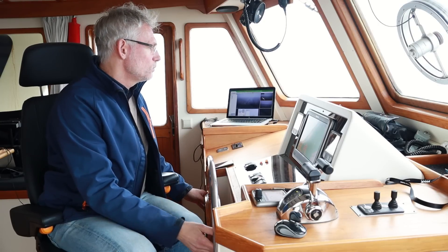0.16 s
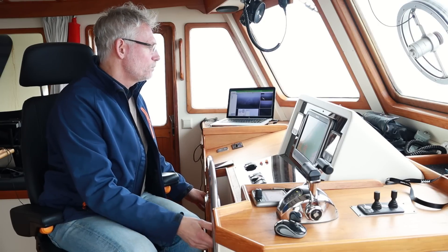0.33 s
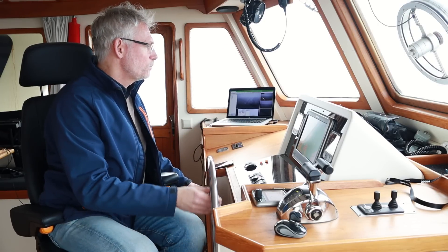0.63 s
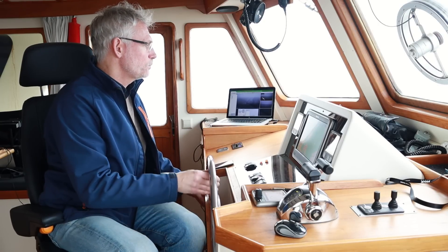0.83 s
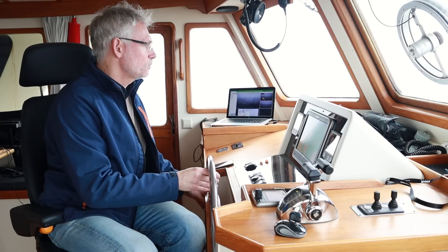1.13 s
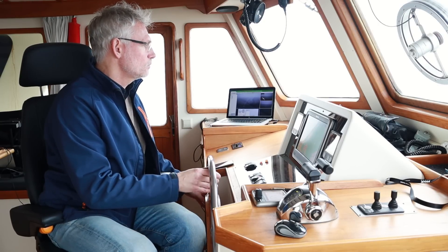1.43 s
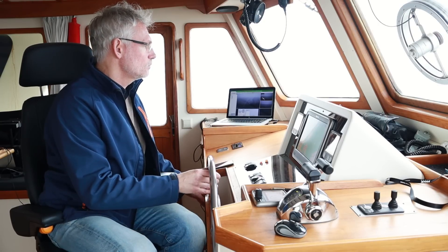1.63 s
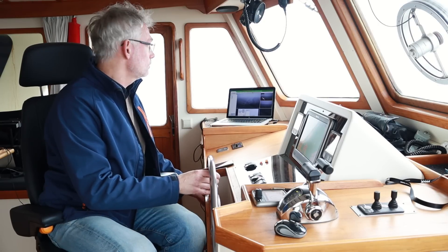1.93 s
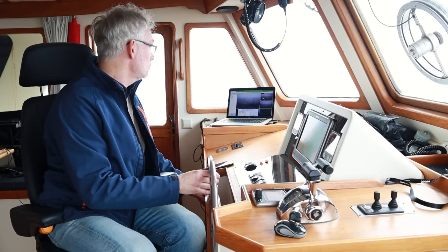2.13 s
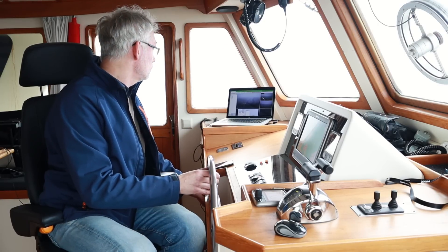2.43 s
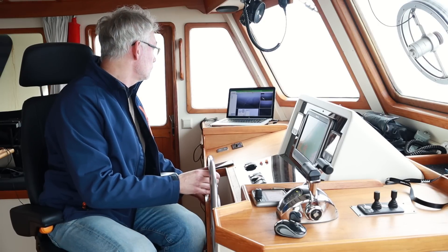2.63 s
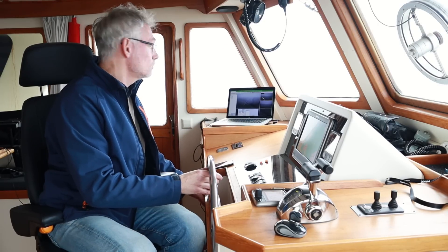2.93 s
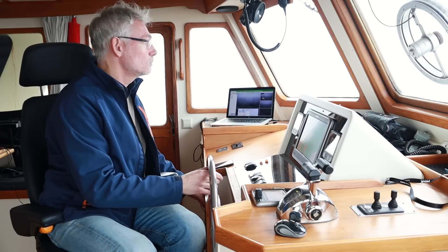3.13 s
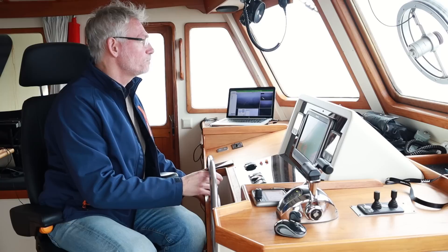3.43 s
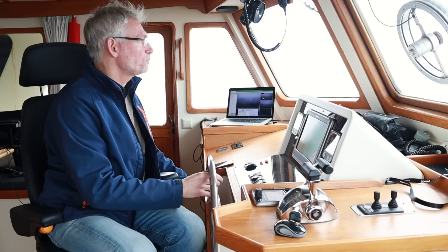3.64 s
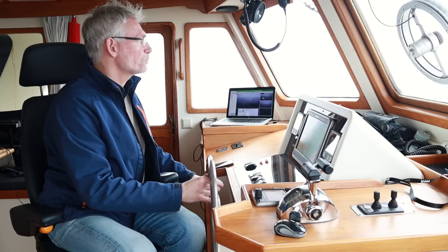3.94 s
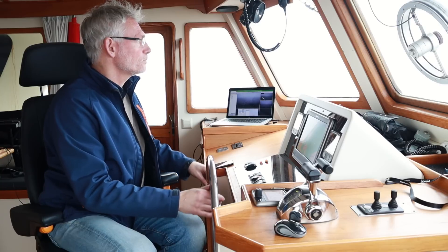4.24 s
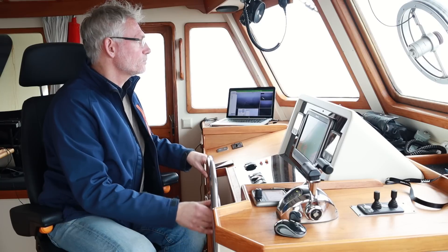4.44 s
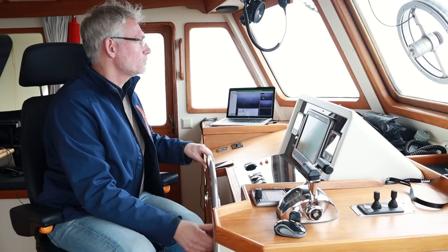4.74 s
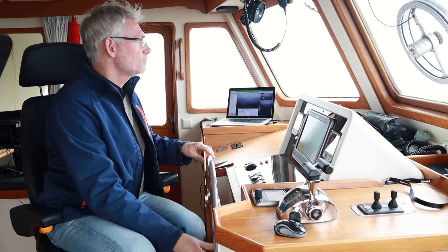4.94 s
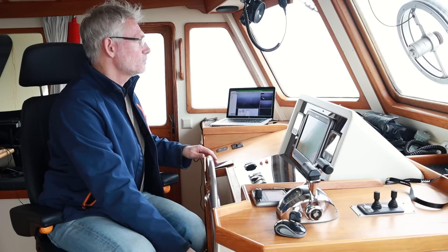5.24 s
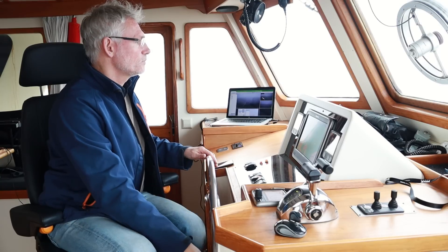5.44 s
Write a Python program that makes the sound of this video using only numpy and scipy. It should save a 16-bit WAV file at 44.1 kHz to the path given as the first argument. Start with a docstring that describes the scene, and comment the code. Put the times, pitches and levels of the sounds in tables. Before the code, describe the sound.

Low engine drone and slight helm noises for three seconds, then a short pump whirr and one long, brassy, unwavering boat horn note to the end.

```python
"""An air horn on the roof of a small boat gives one long steady blast, heard inside the wheelhouse:
a chopped air stream makes its overtones, each weighted by the resonances of roof and cabin.
A diesel idles below deck as cycle tones, shaken panels and a broad drone.
At the helm cloth rustles and small things knock, as shaped noise. The horn's little air pump whirs up
first and makes the note throb faintly; the recorder turns its gain down when the blast arrives."""
import sys
import numpy as np
from scipy import signal
from scipy.fft import rfft, irfft, next_fast_len
from scipy.io import wavfile
from scipy.ndimage import map_coordinates

SR = 44100
rng = np.random.default_rng(int(sys.argv[2]) if len(sys.argv) > 2 else 0)


def pcm_store(signal):
    """Save signal as 16-bit PCM."""
    levels = np.round(np.clip(np.atleast_2d(signal), -1, 1) * 32767)
    wavfile.write(sys.argv[1], SR, levels.astype(np.int16).T)


def elevation(decibels):
    """Turn decibel levels (scalar or array-like) into linear amplitude ratios."""
    levels = np.asarray(decibels, float)
    return 10 ** (levels / 20)


N = 245637
TIME = np.arange(N) / SR


def unit(x):
    """Scaled to rms 1."""
    return x / np.sqrt(np.mean(x ** 2) + 1e-20)


def wobble(rate):
    """A smooth random curve of 200 knots, rate knots a second, and zero after the last."""
    return map_coordinates(rng.standard_normal(200), [TIME * rate])


def filtered(x, response):
    """x times a response of frequency, padded so that its tail does not wrap round."""
    m = next_fast_len(N + 8192)
    return irfft(rfft(x, m) * response(np.fft.rfftfreq(m, 1 / SR)), m)[:N]


def coloured(x, points):
    """x through (f/Hz, level/dB) points read on a log frequency axis."""
    f, db = np.transpose(points)
    return filtered(x, lambda hz: elevation(np.interp(np.log(hz + 1), np.log(f + 1), db)))


def noise():
    """White noise."""
    return rng.standard_normal(N)


def tone(turn):
    """A sine of rms 1 at the phase turn."""
    return np.sqrt(2) * np.sin(turn)


# diesel below deck, tones at multiples of the cycle rate: [multiple, rms level/dB, unsteadiness/dB]
CYCLE_TONES = [(5.92, -35.5, 0.34), (10.22, -54, 1.8), (11.13, -57.5, 2), (11.49, -53.5, 2),
               (11.96, -45.5, 1.2), (16.14, -54.5, 2), (17.95, -48, 2.5), (21.93, -52, 2.5),
               (26.85, -54, 1.8), (36.2, -56, 2.3), (38.85, -58.5, 2.2), (39.9, -55, 3), (47.35, -54, 2),
               (49.4, -52.5, 1.2), (50.96, -52.5, 2.6), (51.3, -49, 3.6), (53, -55, 2.1),
               (53.56, -48.5, 2.2), (54, -53.5, 2)]
# hull and cabin panels shaken by the engine: [f/Hz, width/Hz, relative level/dB]
PANELS = [(92.5, 14, -5), (173.6, 32.6, -8), (191.2, 24, -4.5), (283, 23, -11), (356, 15, -11),
          (410.6, 17, -7), (440.6, 16, -4), (471.8, 13.8, -1.5), (572, 45, -13), (682, 15, -10),
          (700, 26, -16.5)]
# colour of the broad engine noise: [f/Hz, relative level/dB per Hz]
DRONE = [(15, -34), (35, -12.5), (70, -12), (250, -12.5), (500, -11.5), (750, -18), (1300, -23),
         (2200, -24), (3500, -31.5), (6500, -38.5), (9000, -46), (11000, -53.5), (15500, -52.5)]
CYCLE_HZ, CYLINDERS = 8.775, 6  # each cylinder fires once per engine cycle


def panel_response(f):
    """Sum of damped resonances, one per panel, with alternating sign."""
    total = 0
    for k, (centre, width, db) in enumerate(PANELS):
        damping = 1j * f * width
        total = total + (-1) ** k * elevation(db) * damping / (centre ** 2 - f ** 2 + damping)
    return total


def engine():
    """Cycle tones, panels rung by noise that swells with each firing, and a broad drone."""
    turn = 2 * np.pi * np.cumsum(CYCLE_HZ + 0.006 * wobble(3)) / SR
    tones = np.zeros(N)
    for k, db, sway_db in CYCLE_TONES:
        level = elevation(db + sway_db * wobble(5))
        tones += level * tone(k * turn + k * k + np.pi / 2)
    firing = 1 + 0.3 * np.cos(CYLINDERS * turn)
    panels = elevation(-37.5) * unit(filtered(firing * noise(), panel_response))
    drone = elevation(-37.5 + 0.76 * wobble(6.52)) * unit(coloured(noise(), DRONE))
    return tones + panels + drone


# sleeve rubbing in soft swells at the helm: [middle t/s, peak level/dB, half length/s]
RUSTLE = [(0.574, -54, 0.23), (4.198, -60, .6), (5.18, -53, .22)]
# colour of the cloth: [f/Hz, relative level/dB per Hz]
CLOTH = [(500, -34), (2000, -2.5), (5000, 4), (9000, -1.5), (13000, -12), (16000, -13)]
RUSTLE_REST_DB = -65  # the swells add to this


def rustle():
    """A rubbing sleeve: cloth-coloured noise in bell-shaped swells with a fine flutter of level."""
    rub = elevation(RUSTLE_REST_DB)
    for middle, db, half in RUSTLE:
        rub = rub + elevation(db) * np.exp(-((TIME - middle) / half) ** 2)
    return rub * elevation(0.8 * wobble(40)) * unit(coloured(noise(), CLOTH))


# small knocks and scuffs at the helm: [start t/s, rms level before decay/dB, t60/s, centre f/Hz]
KNOCKS = [(.003, -42, .4, 2100), (.745, -39, .2, 1200), (2.83, -58, .15, 8000), (2.868, -42, .1, 1300),
          (3.725, -42, .15, 2800), (3.85, -40, .25, 2900), (4.494, -38, .05, 4200), (4.506, -37, .1, 2600)]


def knocks():
    """Small things knock as short dying puffs of noise, each with its own colour."""
    sound = np.zeros(N)
    for start, db, t60, hz in KNOCKS:
        # the colour falls 16 dB one octave from the centre, 64 dB at two
        puff = unit(filtered(noise(), lambda f: elevation(-16 * np.log2((f + 1) / hz) ** 2)))
        age = np.maximum(TIME - start, 0)
        rise = 1 - np.exp(-age / 0.00091)
        sound += elevation(db - 60 * age / t60) * rise * puff
    return sound


# tones of the air pump: [f/Hz, rms level/dB]
PUMP = [(447, -50), (545, -40), (592, -39.5), (645, -48.5)]
PUMP_ON_S, WHIRR_RISE_S, TONE_RISE_S = 2.87, 0.028, 0.16


def pump():
    """The pump motor hums in a few fuzzy tones, which swell in over a whirr."""
    tones = np.zeros(N)
    for hz, db in PUMP:
        level = elevation(db + 1.5 * wobble(12))
        tones += level * tone(2 * np.pi * np.cumsum(hz + 1.3 * wobble(4)) / SR)
    whirr_colour = [(300, -29.5), (700, 1.5), (1400, 0.0), (2500, -11), (5000, -26), (16000, -72)]
    whirr = elevation(-41) * unit(coloured(noise(), whirr_colour))
    whirr_rise = np.clip((TIME - PUMP_ON_S) / WHIRR_RISE_S, 0, 1)
    tone_rise = np.clip((TIME - PUMP_ON_S) / TONE_RISE_S, 0, 1)
    return whirr_rise * whirr + tone_rise * tones


# narrow resonances (+) and nulls (-) of roof and cabin that the overtones slide through:
# [f/Hz, width/Hz, level/dB]
CABIN = [(262.2, 3.7, -6.5), (524.4, 10, -4.5), (793.3, 40, -38), (1052.9, 8.8, 20), (1305.3, 12, 15.5),
         (1572.1, 12.6, 20), (1827.7, 20.6, 14), (1843, 22.9, -9.4), (2109.1, 47.6, -30),
         (2126, 33.2, -17.7), (2352, 4.5, -11.5), (2366.4, 7.5, -12.8), (2619.5, 7.5, -13.2),
         (2631, 21.2, 16), (2869, 5.5, 4), (2892.4, 18.2, -17), (3124.1, 19.2, 5.4), (3389.8, 6.5, 12.5),
         (3400.1, 68.4, -25.2), (3650.3, 7, 11), (3683.4, 10, 9.8), (3929.1, 24.1, -10.5),
         (3973.2, 54.3, -8), (4174.2, 17.2, 11.1), (4451, 74.2, -16.9), (4695.5, 8, -8), (4703.6, 12, 10.9),
         (4723.2, 17.1, 18.2)]


def cabin(f):
    """Complex response of roof and cabin at the frequencies f, a product of peaks and dips."""
    response = 1
    for centre, width, db in CABIN:
        detuning, damping = centre ** 2 - f ** 2, 1j * f * width
        response = response * (detuning + damping * elevation(db)) / (detuning + damping)
    return response


# the held note of the horn on the roof: [overtone number, rms level/dB]
OVERTONES = [(1, -27), (2, -18), (3, -11), (4, -20.5), (5, -16), (6, -25.5), (7, -24.5), (8, -28),
             (9, -39.5), (10, -54), (11, -40), (12, -40), (13, -44.5), (14, -44.5), (15, -52), (16, -48.5),
             (17, -67), (18, -66.5)]
# the valve opens and air reaches the diaphragm over the attack, slowly at first (power of the rise);
# higher overtones speak later (power added for each)
VALVE_S, ATTACK_S, RISE_POWER, RISE_PER_OVERTONE = 3.016, 0.033, 2, 0.14
# the note starts sharp while the air pressure settles:
# a quick bell-shaped slide and a slow sag onto the held pitch
HELD_HZ, SLIDE_FROM_S, SHARP_HZ, SLIDE_S, SAG_HZ, SAG_S = 260.88, 3, 5.8, 0.08, 0.5, 0.25
THROB_HZ = 62.9  # pump strokes


def horn():
    """A diaphragm chops the air once a cycle; the cabin weighs and delays each overtone as pitch slides."""
    age = np.maximum(TIME - SLIDE_FROM_S, 0)
    pitch = HELD_HZ + SHARP_HZ * np.exp(-(age / SLIDE_S) ** 2) + SAG_HZ * np.exp(-age / SAG_S)
    turn = 2 * np.pi * np.cumsum(pitch + 0.029 * wobble(6.5)) / SR
    steps = np.linspace(HELD_HZ, pitch.max(), 200)
    air = np.clip((TIME - VALVE_S) / ATTACK_S, 0, 1)
    sound = np.zeros(N)
    for k, db in OVERTONES:
        passed = cabin(k * steps)
        # relative to the held pitch, where the table's level holds
        size = elevation(db) * np.interp(pitch, steps, passed / passed[0])
        waver = elevation(0.11 * k * wobble(3.6))  # moving air and boat: higher overtones waver more
        lag = 1.17 * k * k + np.pi / 12  # radians; the horn's bell spreads each pulse
        rise = air ** (RISE_POWER + RISE_PER_OVERTONE * k)
        wave = np.sqrt(2) * np.real(size * np.exp(1j * (k * turn - lag)))
        sound += waver * rise * wave
    # pump strokes ripple the pressure
    throb = 1 + 0.03 * np.sin(2 * np.pi * np.cumsum(THROB_HZ + 1.1 * wobble(1.7)) / SR)
    return sound * throb


def scene():
    """Everything reaches one microphone in the wheelhouse."""
    return (engine() + rustle() + knocks() + pump() + horn())[None]


def top_cut(x):
    """Nothing passes above the cut-off."""
    return signal.sosfilt(signal.butter(12, 15700, fs=SR, output="sos"), x)


def smoothed(x, tau):
    """x followed with a time constant of tau seconds."""
    return signal.lfilter([1 / (tau * SR)], [1, 1 / (tau * SR) - 1], x, axis=1)


def record(dry):
    """Automatic gain: loudness over a knee is turned down after a short delay, quickly, then slowly."""
    knee_db = -22
    loudness_db = 10 * np.log10(smoothed(dry ** 2, 0.0051) + 1e-9)
    over_db = np.maximum(loudness_db - knee_db, 0)
    quick = smoothed(smoothed(over_db, 0.02), 0.02)
    slow = smoothed(over_db, 0.3)
    mix = dry * elevation(-0.5 * quick - 0.025 * slow)
    return top_cut(mix)


dry = scene()
out = record(dry)
pcm_store(out)
```